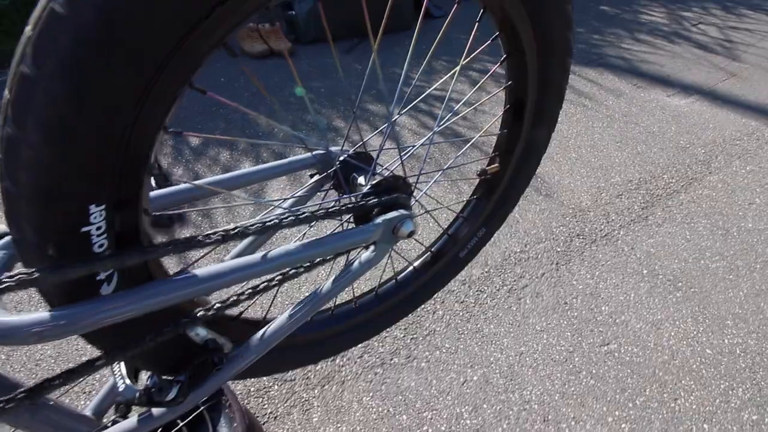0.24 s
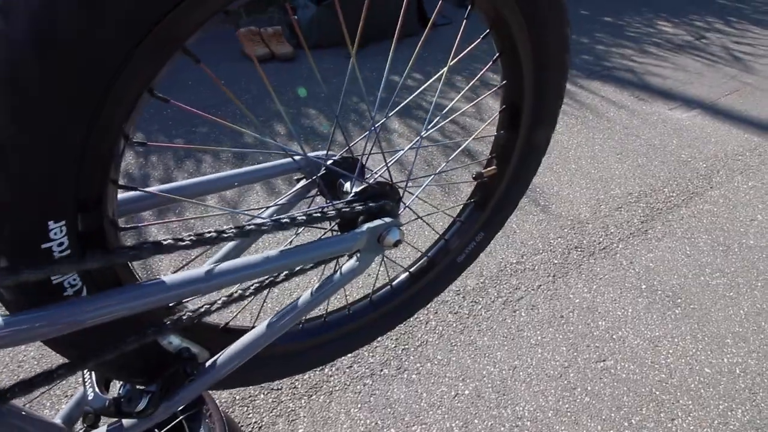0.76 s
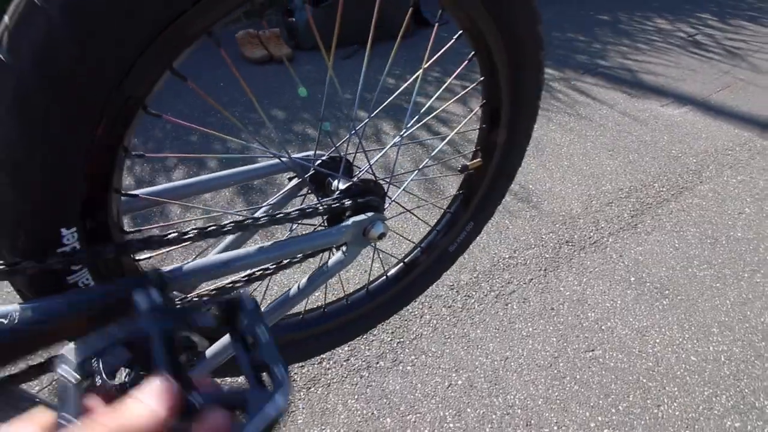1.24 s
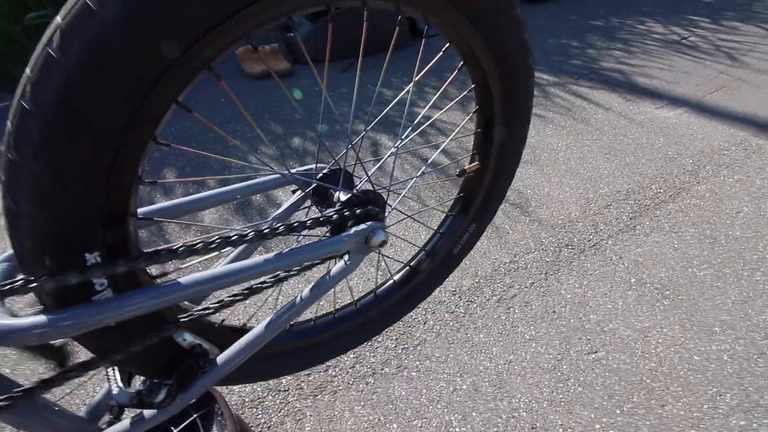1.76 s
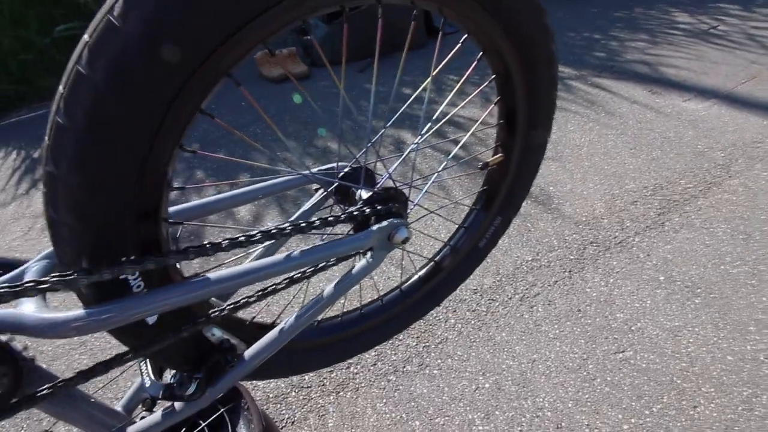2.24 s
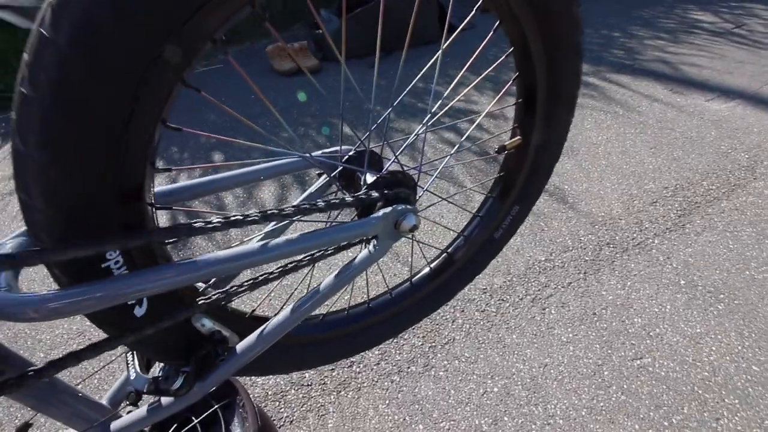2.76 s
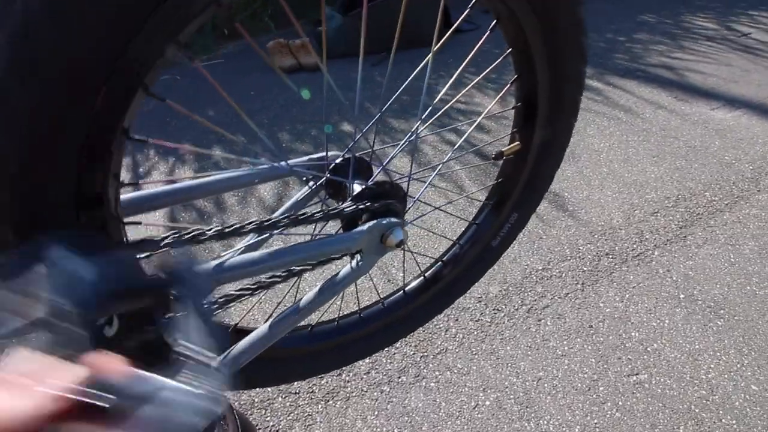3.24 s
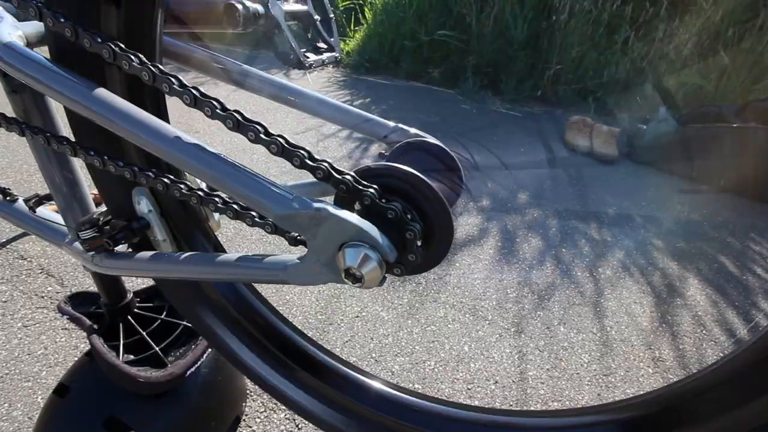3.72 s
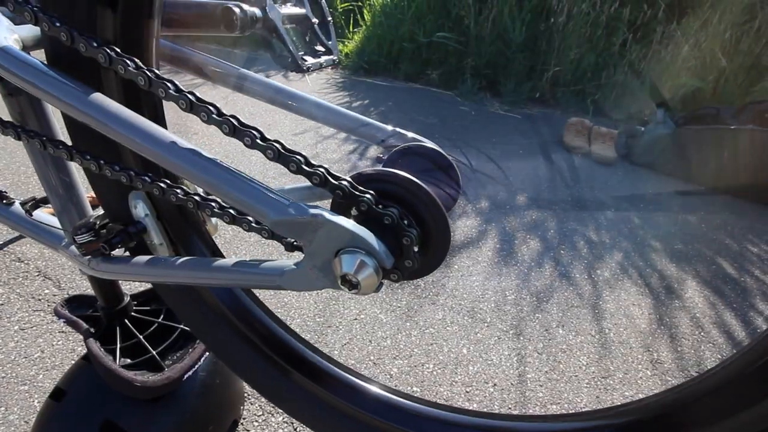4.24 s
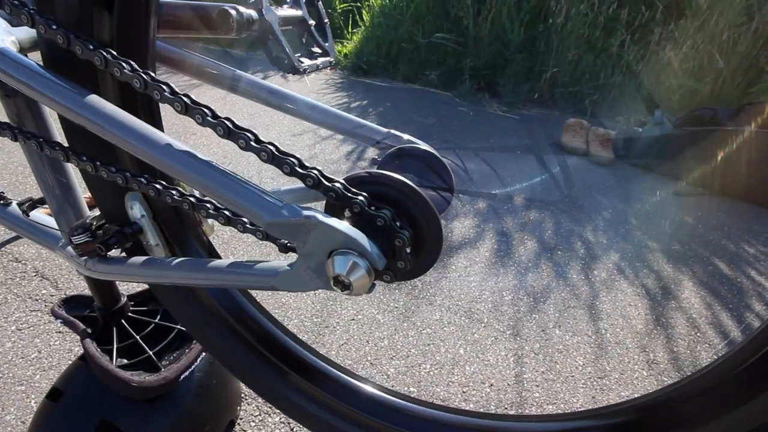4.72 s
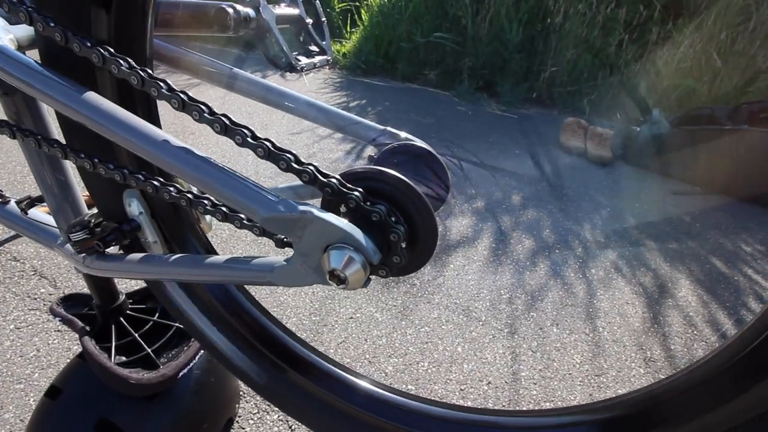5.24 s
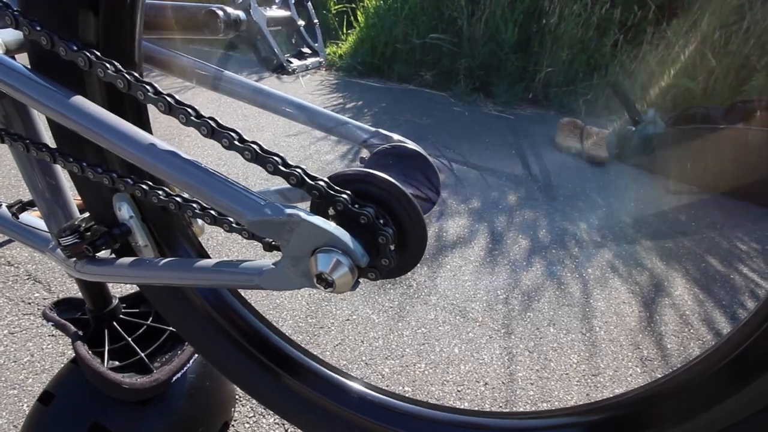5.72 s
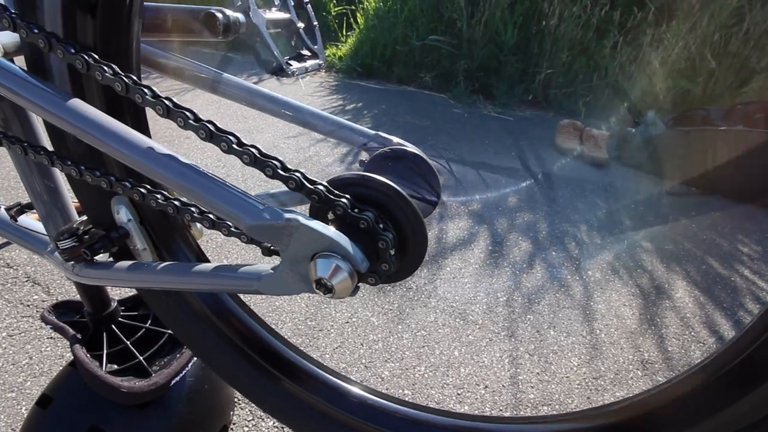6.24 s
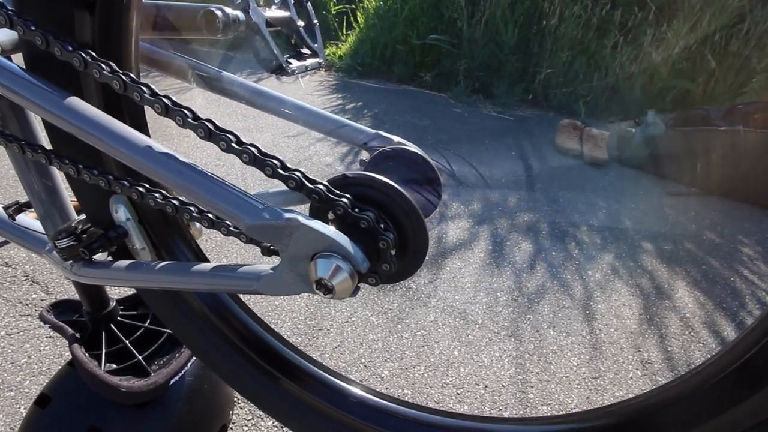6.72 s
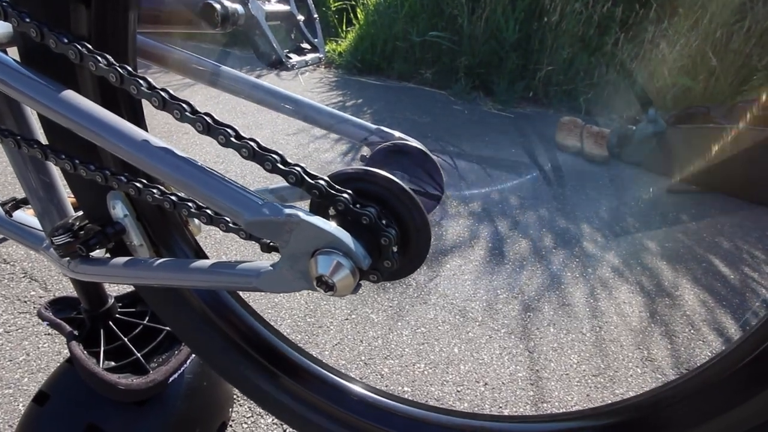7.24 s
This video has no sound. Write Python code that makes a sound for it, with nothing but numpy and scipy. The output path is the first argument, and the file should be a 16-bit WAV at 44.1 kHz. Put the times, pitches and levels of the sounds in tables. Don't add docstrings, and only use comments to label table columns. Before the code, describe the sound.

A dry, close, nearly mono sound of a bike freehub on open pavement. First come hand-driven surges of rapid clicking with ringing spokes and frame, light chain rattle and low wind gusts; midway it slows into countable clicks before speeding up again. Then a hard scene change: the wheel spins freely with a dense, even, higher whirring ratchet, calmer air, and a faint distant hum, slowly losing speed without stopping.

```python
import sys
import numpy as np
from scipy import signal
from scipy.fft import rfft, irfft
from scipy.io import wavfile
from scipy.ndimage import uniform_filter1d

SR = 44100
rng = np.random.default_rng(int(sys.argv[2]) if len(sys.argv) > 2 else 0)


def level_to_linear(level):
    exponent = np.asarray(level, float) / 20
    return 10 ** exponent


def store_wav(level_fs):
    pcm = np.round(np.clip(np.atleast_2d(level_fs), -1, 1) * 32767)
    wavfile.write(sys.argv[1], SR, pcm.T.astype(np.int16))


N = 329868

CUT_S = 3.6
# time in seconds, teeth per second, buzz level in dB.
HAND_PUSHES = [
    [(0, 230, -20), (.09, 208, -18), (.2, 288, -18.5), (.25, 298, -20), (.33, 336, -19), (.42, 232, -20.5)],
    [(.51, 268, -19), (.56, 247, -19), (.72, 229, -18.5), (.87, 252, -18.5), (.94, 296, -18.5),
     (1.02, 282, -18.5), (1.1, 313, -19), (1.19, 201, -19.5)],
    [(1.31, 246, -16.5), (1.39, 210, -20), (1.49, 234, -17.5), (1.52, 187, -19), (1.65, 244, -18),
     (1.76, 260, -18.5), (1.85, 252, -18.5), (1.92, 212, -20), (2, 160, -22)],
    [(2.3, 150, -22), (2.39, 248, -19.5), (2.51, 168, -21), (2.56, 195, -18), (2.64, 270, -18.5),
     (2.73, 286, -19), (2.8, 296, -18), (2.87, 310, -20.5), (3, 300, -17.5)],
    [(3.05, 308, -19.5), (3.12, 406, -18.5), (3.23, 470, -19), (3.34, 386, -19.5), (3.43, 310, -19),
     (3.5, 335, -18), (3.6, 247, -19)],
]
# time in seconds, peak in dB.
SLOW_TEETH = [(1.931, -5), (1.937, -10), (1.9415, -9), (1.948, -9), (1.9546, -11), (1.9606, -9),
              (1.9679, -6), (1.9749, -7), (1.984, -10), (1.99, -8), (1.9979, -9), (2.0055, -7),
              (2.0132, -6), (2.0218, -6), (2.029, -5), (2.0378, -7), (2.0466, -5), (2.0559, -9),
              (2.0663, -6), (2.0785, -6.5), (2.0929, -7.5), (2.1085, -7), (2.1272, -5), (2.153, -9),
              (2.1849, -7), (2.1872, -14), (2.2166, -5), (2.2405, -8), (2.258, -5.5), (2.2719, -5),
              (2.282, -5), (2.292, -9), (2.3, -5.5), (2.3067, -9), (2.3138, -8), (2.319, -7), (2.3254, -8),
              (2.33, -7), (2.3367, -9), (2.3419, -7), (2.3468, -8), (2.352, -6), (2.357, -10), (2.3623, -9),
              (2.367, -7), (2.371, -10), (2.375, -12), (2.38, -6), (2.3847, -8)]
FREE_HZ, SAG_HZ_PER_S, FREE_DB = 513.2, 14.2, -18
TEETH_PER_TURN, SWELL_DB, SWELL_PEAK_S = 144, 0.56, 5.665
BRIGHT_DB, BRIGHT_PER_DB = 1.37, .5
# frequency in Hz, level in dB per Hz.
HUB_RING = [
    [(650, -24), (1100, -10), (1590, -19), (1740, -2), (2300, -7), (2570, 0.5), (2930, 3.5), (4480, -7.5),
     (5480, -5), (8000, -13), (8560, -8.5), (9250, -3.5), (12600, -15), (14300, -9), (15800, -10.5)],
    [(650, -29), (1100, -20), (1310, -21), (1470, -8.5), (1610, -12.5), (2250, -3), (3210, 3.5),
     (4150, -4.5), (4630, -8.5), (6120, -7), (6770, -14.5), (9150, -3), (12800, -10.5), (15100, -6),
     (15800, -6)],
]
# frequency in Hz, width in Hz, level in dB.
SPOKE_MODES = [
    [(948, 45, -2), (1027, 110, -10), (1230, 16, -8), (1480, 42, -6.5), (1804, 9, 7), (2115, 20, 5),
     (2121, 18, 2.5), (2510, 69, 4), (2727, 32, 3), (2610, 35, 4.5), (2850, 18, 1), (2920, 20, -0.5),
     (3010, 25, 3), (3090, 26, 3), (3220, 42, 0), (3303, 40, 10), (3585, 22, 6.5), (3940, 150, 1.5),
     (4170, 160, 1), (5450, 300, -1.5), (9260, 140, -5), (8780, 120, -0.5), (10130, 200, -4),
     (9600, 1300, -3), (12130, 90, -9), (13040, 110, -4), (14650, 260, -11), (12800, 1200, -7),
     (13700, 150, -9)],
    [(944, 73, 8.5), (1020, 45, -7), (1250, 69, -9), (1490, 99.3, -29), (1820, 75, 0.5), (2590, 130, 9.5),
     (4170, 120, 12.5), (5015, 180, 6.5), (8960, 1300, 7), (10248, 1400, -6), (14200, 393, -5),
     (15800, 496, -4), (14120, 430, -28)],
]
SPOKE_DB = [-5, -9]
# frequency in Hz, t60 in seconds.
HUB_DECAY = [(400, 0.029), (1500, 0.13), (2500, 0.11), (3900, 0.066), (4800, 0.024), (6500, 0.034),
             (9500, 0.044), (15000, 0.022)]
# multiple of the tooth rate, level in dB rms, flutter in dB.
WHIRR_TONES = [
    (1, -51.5, 3.5),
    (2, -48, 1),
    (3, -54.5, 3.5),
    (4, -48, 3),
]
# start in seconds, end in seconds, low edge in Hz,
# high edge in Hz, lift in dB.
BAND_LIFTS = [(-4, 1.5, 1750, 1850, -4.5), (5, 2.1, 4600, 7200, 1), (-1, 1.27, 3250, 3360, -5),
              (4, 8, 4100, 4260, -1.5), (1, 2.3, 4995, 5400, 2), (0.5, 3.1, 3800, 11000, 0),
              (-2, 1.23, 14950, 15800, -2), (2, 2.383, 9700, 10400, 1), (0, 0.39, 9300, 9700, 8),
              (-5, 1.25, 8500, 9000, 3.5), (1.7, 2.5, 8400, 9000, -2), (0.5, 3.895, 8600, 9100, 1.5),
              (1, 2.16, 9150, 9750, -1), (2, 3.55, 9200, 10000, 3), (-3, 1.3, 10000, 10700, 3),
              (-2, 3.586, 11450, 11950, 4), (6, 8, 8750, 9200, 0.5), (3.4, 8, 9350, 10000, 1.5),
              (1.5, 3.8, 2070, 2180, -4), (1.85, 4, 1770, 1810, -1.5), (4, 8, 2270, 2250, 1.5),
              (2, 8, 13400, 14000, 2), (2.9, 3.7, 12300, 13000, 5.5), (2.6, 3.68, 13600, 14100, 2.5),
              (0, 1.25, 14400, 14900, 4), (1, 2.65, 14300, 15800, -3.5), (2, 3.69, 15300, 15800, 4)]
FRAME_HZ, FRAME_WIDTH_HZ, FRAME_DB, MEET_DB = 935, 22, [-38, -38], [-0.5, 5.5]
THROB_DB, THROB_DIP_S = -1, 7
# time in seconds, level in dB above rest.
FRAME_JERKS = [(.17, 3), (.31, 7), (.45, 7.5), (.56, 18), (.68, 9), (.86, 7), (.97, 9), (1.08, 8), (1.3, 0),
               (1.62, 9), (1.7, 15.5), (1.8, -2), (1.87, 1), (1.96, 6), (2.03, 2), (2.2, -3), (2.33, -15),
               (2.42, -6), (2.62, 7.5), (2.69, -12), (2.84, 6), (2.92, 9), (3.0, 4), (3.06, 4), (3.13, -15),
               (3.3, 3), (3.37, -12), (3.48, 11.5), (3.56, 9), (3.63, -1), (3.72, -9), (3.77, 10),
               (3.98, 11), (4.28, -12), (4.33, 12), (4.54, -12), (5.04, -12), (5.16, -7), (5.23, 5),
               (5.48, -16), (5.59, 0), (5.68, 11), (5.77, -8), (5.86, 5), (5.92, -9), (6.07, -8), (6.18, 8),
               (6.34, 9), (6.43, -3), (6.52, 6), (6.6, 1), (6.75, 5), (6.88, -7), (7.3, -5), (7.39, 3)]
JERK_S = 0.034
# time in seconds, rattle level in dB.
CHAIN_SLACK = [(0, -43.5), (1.1, -41.5), (1.9, -39.5), (2.12, -34), (2.28, -34.5), (2.36, -41), (2.5, -38),
               (2.58, -36), (2.78, -40), (2.9, -41), (3.35, -41), (3.45, -41), (3.6, -41)]
# frequency in Hz, level in dB per Hz.
CHAIN_SPECTRUM = [(150, 0), (250, -6), (370, -7.5), (700, -6), (1100, -0.5), (1600, -12.5), (3400, -6.5),
                  (4100, -18), (7000, -28), (15000, -43)]
WASH_DB, RATTLE_DB = -50, .8
# start in seconds, end in seconds,
# frequency in Hz, dB rms.
WHINE_TONES = [
    (1.15, 2.3, 413, -50),
    (1.52, 1.9, 1800, -38),
    (1.6, 2.3, 69, -43),
]
# time in seconds, level in dB.
WIND_GUSTS = [(0, -45), (.1, -35), (.37, -45), (.47, -42), (.9, -37.5), (1.2, -38), (1.5, -34), (1.62, -35),
              (1.7, -27), (1.88, -31), (1.93, -41), (2.12, -25.5), (2.27, -28), (2.34, -43), (2.75, -41),
              (3.07, -44), (3.3, -52), (3.6, -49)]
# frequency in Hz, level in dB per Hz.
WIND_SPECTRA = [
    [(12, -31), (22, -8), (40, -4), (65, -3), (102, -6.5), (134, -6.5), (209, -9), (242, -20), (300, -41),
     (390, -45), (660, -120)],
    [(12, -38), (20, -29), (38, -17), (123, -5.5), (157, -5), (166, -8), (180, 0), (230, -12), (400, -120)],
]
CALM_DB, GUSTY_DB = -52.5, .6
DEEP_HZ, DEEPER_PER_DB, DEEP_FROM_DB = 90, 1, -39
# frequency in Hz, level in dB rms.
MOTOR_HUM = [
    (199.2, -47),
    (312.2, -59),
    (597.5, -55),
]
# time in seconds, low edge in Hz, high edge in Hz.
SPLIT_BANDS = [(1.106, 4260, 5700), (2.686, 5700, 8240), (3.197, 5140, 6330), (3.369, 4220, 8370),
               (3.988, 7610, 15890), (4.313, 10340, 11730), (4.543, 4280, 5700), (4.545, 8980, 10340),
               (5.473, 6980, 7800), (5.798, 9740, 11720), (6.612, 5720, 6830), (6.612, 9680, 11020),
               (7.376, 13150, 15800), (7.446, 10430, 13660)]
EDGE_HZ = 15750


def ratchet(glint_db=(.7, .8, 1.1, .9)):
    out = lift_bands(band(ringing(), 480, 24000) + whirr() + cracks())
    frame = band(out, 880, 1054)
    middle, high, top = band(out, 4300, 7100), band(out, 8730, 9750), band(out, 10500, 12200)
    rest = out - frame - middle - high - top
    glint = level_to_linear(np.reshape(glint_db, (4, 1)) * drift(130, count=4))
    bright = level_to_linear(BRIGHT_DB + BRIGHT_PER_DB * (motion()[1] - FREE_DB))
    treble = glint[1] * middle + glint[2] * high + glint[3] * top
    return frame_ring(frame) + glint[0] * rest + bright * treble


def ringing():
    rings = [hub(place, count=10) for place in range(2)]
    cut, out = int(CUT_S * SR), np.zeros(N)
    half, blows = motion()[2] / 2, strikes()
    near_face = blows * abs(np.cos(half)) ** 1.3
    far_face = blows * abs(np.sin(half)) ** 1.3
    blows = np.r_[near_face, far_face]
    out[:cut] = signal.oaconvolve(blows[:, :cut], rings[0], axes=1).sum(0)[:cut]
    out[cut:] = signal.oaconvolve(blows[:, cut:], rings[1], axes=1).sum(0)[:N - cut]
    return out


def motion():
    t = np.arange(N) / SR
    hand_hz, hand_db = curves(sum(HAND_PUSHES, []))
    speed = np.where(t < CUT_S, hand_hz, FREE_HZ - SAG_HZ_PER_S * (t - CUT_S))
    angle = 2 * np.pi * np.cumsum(speed) / SR / TEETH_PER_TURN
    swell = np.cos(angle - angle[int(SWELL_PEAK_S * SR)])
    return speed, np.where(t < CUT_S, hand_db, FREE_DB + SWELL_DB * swell), angle


def strikes(count=5, spread_s=(.0008, .0005), jitter_s=(.00025, .00015), uneven_db=2.5, slow_db=5.5):
    speed, level_db, _ = motion()
    slow_s, peak_db = np.transpose(SLOW_TEETH)
    at = np.flatnonzero(np.diff(np.floor(np.cumsum(speed) / SR + .5)))
    at = at[(at < (slow_s[0] - .0035) * SR) | (at > (slow_s[-1] + .0035) * SR)]
    size = level_to_linear(level_db[at]) * np.sqrt(SR / speed[at] / count)
    at = np.r_[((slow_s + .0002) * SR).astype(int), at]
    size = np.r_[level_to_linear(peak_db + slow_db), size]
    place = (at > CUT_S * SR) * 1
    order = np.linspace(-1, 1, count)[:, None]
    chance = rng.standard_normal((len(at), count, 2))
    calm = np.where(np.arange(len(at)) < len(slow_s), .35, np.clip(speed[at] / 330, .55, 1))
    late_s = np.take(spread_s, place) * (1.1 + order + .18 * drift(20, count=count)[:, at])
    late_s += np.take(jitter_s, place) * chance[..., 0].T
    late_s *= calm
    hit = np.clip(at + np.round(late_s * SR).astype(int), 0, N)
    force_db = -5.5 * order ** 2 + 1.96
    force_db = force_db + uneven_db * calm * chance[..., 1].T
    force_db += 1.35 * drift(30, count=count)[:, at] + 0.3 * drift(11.5, count=1)[:, at]
    force = size * level_to_linear(force_db)
    return np.array([np.bincount(h, f, N)[:N] for h, f in zip(hit, force)])


def hub(place, count):
    hz = np.arange(440, 16000, 45)
    hz = hz + rng.uniform(-15, 15, len(hz))
    t60 = read(HUB_DECAY, hz)
    flip = rng.random((count, len(hz))) < 1 / (2 + (1800 / hz) ** 4)
    signs = np.where(flip, -1, 1) * rng.choice([-1, 1], len(hz))
    height = level_to_linear(read(HUB_RING[place], hz)) / np.sqrt(t60)
    dense = evened_treble(modes(hz, height, t60, signs, size=4000, snap=2.14))
    f, width, db = np.transpose(SPOKE_MODES[place])
    pawls = 1 + .5 * rng.standard_normal((count, len(f)))
    clear = modes(f, level_to_linear(db) * width, 4.4 / width, pawls, size=9000)
    both = level_to_linear(SPOKE_DB[place]) * clear / np.linalg.norm(clear)
    both[:, :dense.shape[1]] += dense / np.linalg.norm(dense)
    return both / np.linalg.norm(both, axis=1).mean()


def modes(hz, height, t60, pawls, size, snap=0.):
    t = np.arange(size) / SR
    rings = np.sin(2 * np.pi * hz[:, None] * t) * level_to_linear(-60 * t / t60[:, None])
    rings *= 1 + snap * np.minimum(hz[:, None] / 8000, 1) * np.exp(-t / 0.00066)
    return (pawls * height) @ rings * (1 - np.exp(-t / 0.00027))


def evened_treble(rings):
    z = rfft(rings, 8192)
    power = (abs(z) ** 2).mean(0)
    treble = np.fft.rfftfreq(8192, 1 / SR) > 1900
    broad, fine = uniform_filter1d(power, size=110), uniform_filter1d(power, size=20)
    even = np.sqrt(abs(broad / (abs(fine) + 1e-9)))
    return irfft(z * np.where(treble, even, 1))[:, :rings.shape[1]]


def cracks(low_hz=8400, high_hz=10600, rise_s=0.0011, fall_s=0.0019, db=-4.0):
    slow_s, peak_db = np.transpose(SLOW_TEETH)
    slowness = np.clip(np.gradient(slow_s) / 0.031, 0, 1)
    ticks = np.bincount((slow_s * SR).astype(int), level_to_linear(peak_db + db) * slowness, N)
    t = np.arange(600) / SR
    shape = signal.oaconvolve(ticks, np.minimum(t / rise_s, 1) * np.exp(-t / fall_s))[:N]
    fizz = band(rng.standard_normal(N), low_hz, high_hz)
    return shape * fizz / np.sqrt(abs(uniform_filter1d(fizz ** 2, size=100)) + 1e-9)


def whirr(ring_hz=948, width_hz=35, lift=3.3, stay_hz=1955, stay_width_hz=45, stay_lift=0.68):
    speed, flutter = motion()[0], drift(18.0, count=len(WHIRR_TONES))
    turns, tones = np.cumsum(speed) / SR, np.zeros(N)
    for (k, db, flutter_db), w in zip(WHIRR_TONES, flutter):
        near = 1 + lift / (1 + ((k * speed - ring_hz) / width_hz) ** 2)
        near += stay_lift / (1 + ((k * speed - stay_hz) / stay_width_hz) ** 2)
        phase = 2 * np.pi * k * turns + .2 * flutter_db * w[::-1]
        tones += near * level_to_linear(db + flutter_db * w) * np.sin(phase)
    return np.sqrt(2) * tones * fade(CUT_S, 9, 0.0048)


def lift_bands(x, ramp_s=0.18):
    hz, t, z = signal.stft(x, SR, nperseg=2048, noverlap=1536)
    gain = np.ones(z.shape)
    for start, end, low_hz, high_hz, db in BAND_LIFTS:
        inside = 1 / (1 + ((hz ** 2 - low_hz * high_hz) / (hz + 1) / (high_hz - low_hz)) ** 6)
        during = np.clip(np.minimum(t - start, end - t) / ramp_s, 0, 1)
        gain *= 1 + (level_to_linear(db) - 1) * np.outer(inside, during)
    return signal.istft(z * gain, SR, nperseg=2048, noverlap=1536)[1][:N]


def frame_ring(frame):
    loudness = np.sqrt(abs(uniform_filter1d(frame ** 2, size=6000)) + 1e-9)
    frame = frame * level_to_linear(frame_db() + 1.4 * drift(18.0, count=1)[0]) / loudness
    return frame + (level_to_linear(jerks_db()) - 1) * band(frame, 934.9, 971)


def frame_db():
    speed, _, angle = motion()
    place = (np.arange(N) / SR > CUT_S) * 1
    nearest_hz = np.round(FRAME_HZ / speed) * speed
    meet = 1 / (1 + ((nearest_hz - FRAME_HZ) / FRAME_WIDTH_HZ) ** 2)
    throb = np.cos(2 * (angle - angle[int(THROB_DIP_S * SR)]))
    return np.take(FRAME_DB, place) + meet * (np.take(MEET_DB, place) + place * THROB_DB * throb)


def jerks_db():
    t = np.arange(0, N, 64) / SR
    return np.repeat(sum(db * np.exp(-((t - s) / JERK_S) ** 2) for s, db in FRAME_JERKS), 64)[:N]


def chain():
    turned = np.arange(N) / SR < CUT_S
    level_db = np.where(turned, curves(CHAIN_SLACK)[0], WASH_DB)
    level_db = level_db + RATTLE_DB * drift(4.9, count=1)[0] * turned
    return level_to_linear(level_db + 7.0) * noise(CHAIN_SPECTRUM, 1.3, size=512)


def whines():
    tones = np.zeros(N)
    for (start, end, hz, db), w in zip(WHINE_TONES, drift(8.1, count=len(WHINE_TONES))):
        tone = np.sin(2 * np.pi * np.cumsum(hz + 1.95 * w) / SR)
        tones += fade(start, end, 0.037) * level_to_linear(db + 1.3 * w) * tone
    return np.sqrt(2) * tones


def wind():
    early = np.arange(N) / SR < CUT_S
    level_db = np.where(early, curves(WIND_GUSTS)[0], CALM_DB)
    level_db = level_db + GUSTY_DB * drift(4.9, count=1)[0] * early
    rumble = np.where(early, noise(WIND_SPECTRA[0], 1.5, size=2048), noise(WIND_SPECTRA[1], 2.0, size=2048))
    lean_db = DEEPER_PER_DB * (level_db - DEEP_FROM_DB) * early
    upper = band(rumble, DEEP_HZ, 2000)
    deep = level_to_linear(np.minimum(lean_db, 0)) * (rumble - upper)
    return level_to_linear(level_db) * (deep + level_to_linear(-np.maximum(lean_db, 0)) * upper)


def motor():
    hum = np.zeros(N)
    for (hz, db), w in zip(MOTOR_HUM, drift(8.1, count=len(MOTOR_HUM))):
        hum += level_to_linear(db + 0.27 * w) * np.sin(2 * np.pi * np.cumsum(hz + 1.1 * w) / SR)
    return np.sqrt(2) * hum * (np.arange(N) / SR > CUT_S)


def evened(x):
    return x / np.sqrt(np.mean(x ** 2) + 1e-20)


def read(points, hz):
    f, value = np.transpose(points)
    return np.interp(np.log(hz + 1), np.log(f + 1), value)


def curves(rows):
    s, *columns = np.transpose(rows)
    return [np.interp(np.arange(N) / SR, s, c) for c in columns]


def drift(hz, count):
    size = int(SR / 64 / hz) + 1
    slow = rng.standard_normal((count, N // 64 + 1))
    slow = uniform_filter1d(uniform_filter1d(slow, size), size)
    slow -= uniform_filter1d(slow, 5 * size)
    return uniform_filter1d(np.repeat(evened(slow), 64, axis=1), 64)[:, :N]


def noise(spectrum, patchy_db, size):
    hz = np.fft.rfftfreq(size, 1 / SR)
    a, b, patches = rng.standard_normal((N * 4 // size + 5, len(hz), 3)).T
    patches = evened(uniform_filter1d(uniform_filter1d(patches, size=5, axis=0), size=4, axis=1))
    z = (a + 1j * b) * level_to_linear(read(spectrum, hz)[:, None] + patchy_db * patches)
    return evened(signal.istft(z, nperseg=size, noverlap=size * 3 // 4)[1][:N])


def band(x, low_hz, high_hz):
    sos = signal.butter(3, [low_hz, min(high_hz, 20000)], "band", fs=SR, output="sos")
    return signal.sosfiltfilt(sos, x, padtype="even")


def fade(start, end, ramp_s):
    t = np.arange(N) / SR
    return np.clip(np.minimum(t - start, end - t) / ramp_s, 0, 1)


def scene():
    return np.tile(ratchet() + chain() + whines() + wind() + motor(), (2, 1))


def band_limit(x):
    return signal.sosfilt(signal.butter(12, 17040, fs=SR, output="sos"), x)


def record(dry):
    low_pass = signal.firwin(1023, EDGE_HZ, window=("kaiser", 9), fs=SR)
    mono = signal.oaconvolve(1.3 * np.tanh(dry[0] / 1.3), low_pass, "same")
    side, hz = np.zeros(N), np.fft.rfftfreq(2048, 1 / SR)
    window = np.sin(np.pi * np.arange(2048) / 2048)
    for s, low_hz, high_hz in SPLIT_BANDS:
        start = min(int(s * SR) - 1024, N - 2048)
        part = rfft(mono[start:start + 2048] * window) * (hz > low_hz) * (hz < high_hz)
        scrambled = irfft(part * np.exp(2j * np.pi * rng.random(len(hz))))
        side[start:start + 2048] += level_to_linear(1.) * window * scrambled
    mix = np.array([mono + side, mono - side])
    return band_limit(mix)


dry = scene()
out = record(dry)
store_wav(out)
```